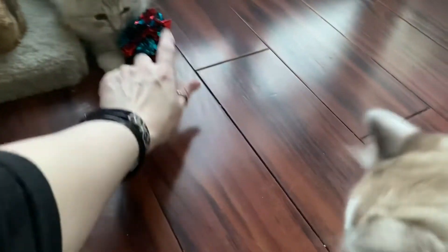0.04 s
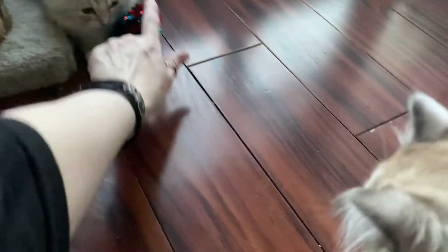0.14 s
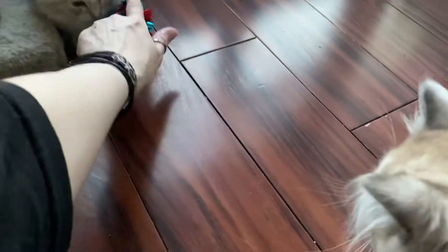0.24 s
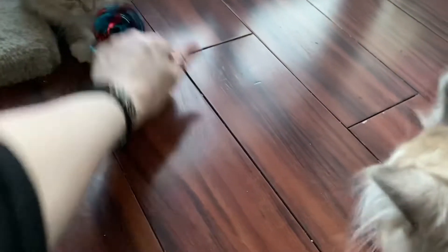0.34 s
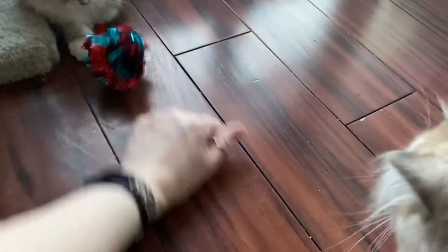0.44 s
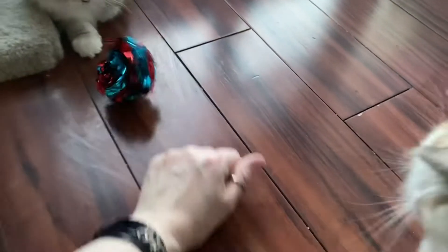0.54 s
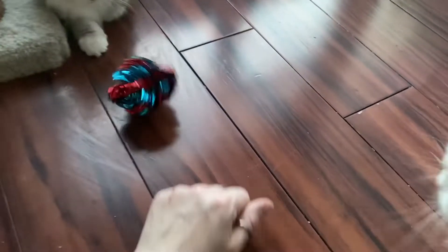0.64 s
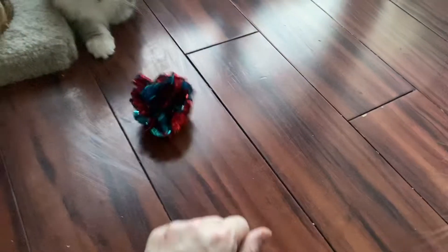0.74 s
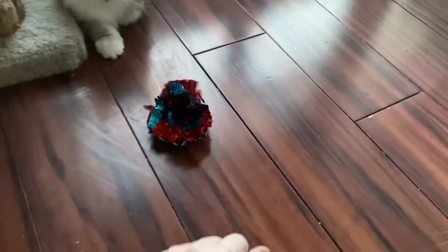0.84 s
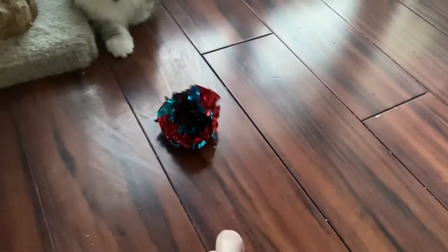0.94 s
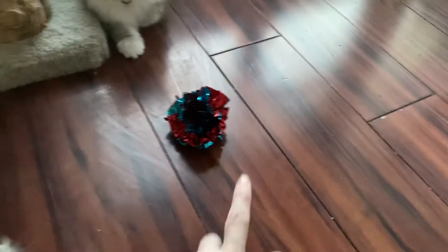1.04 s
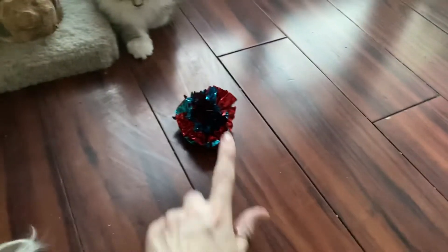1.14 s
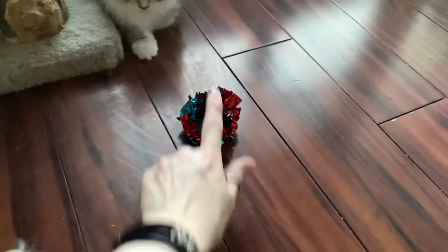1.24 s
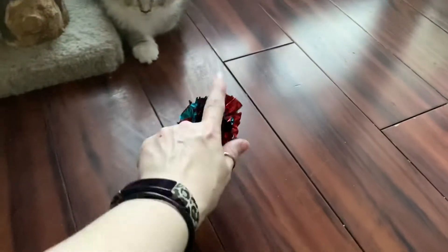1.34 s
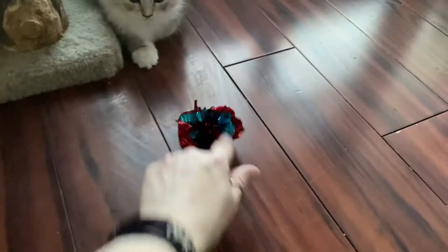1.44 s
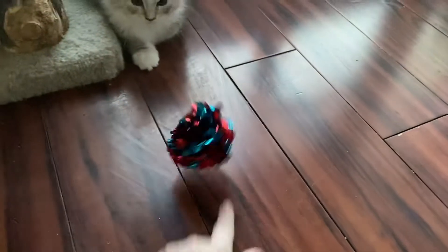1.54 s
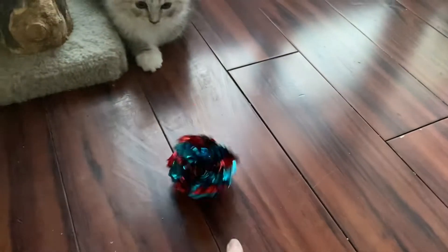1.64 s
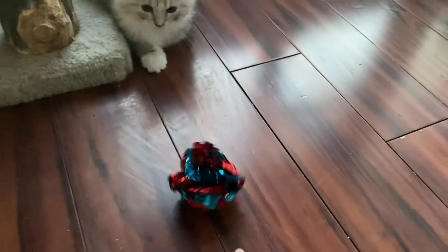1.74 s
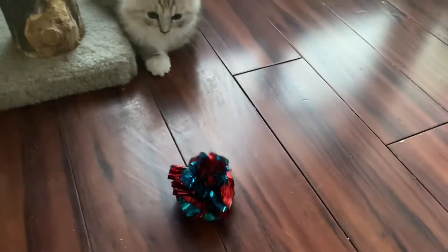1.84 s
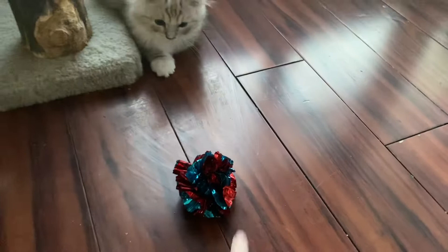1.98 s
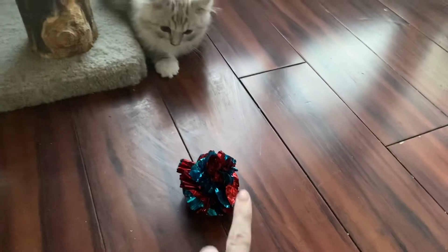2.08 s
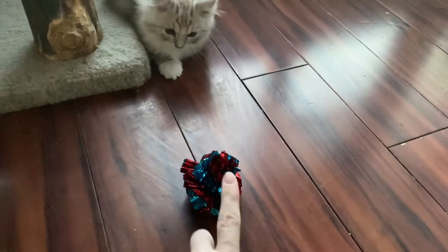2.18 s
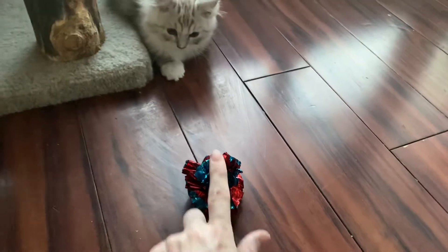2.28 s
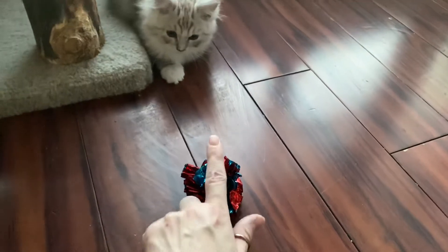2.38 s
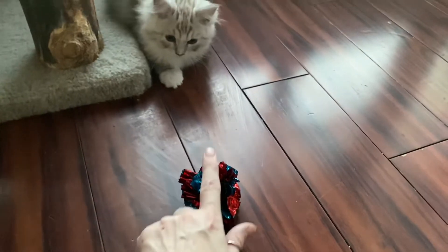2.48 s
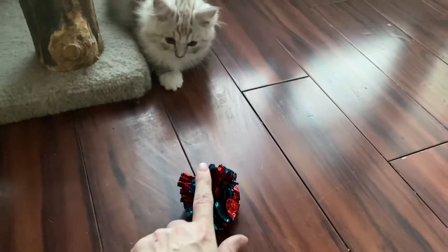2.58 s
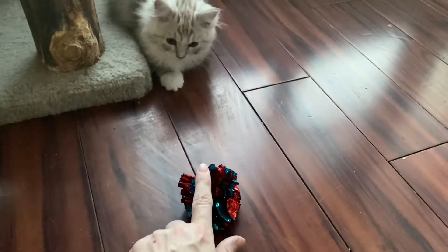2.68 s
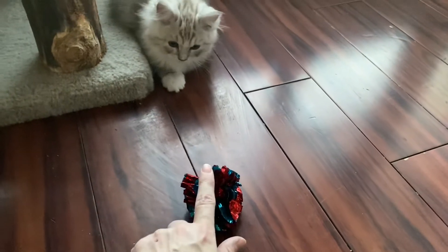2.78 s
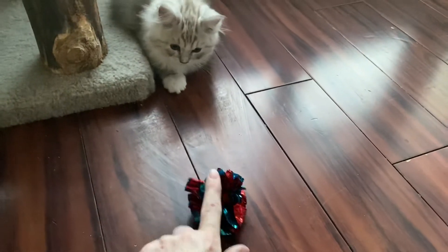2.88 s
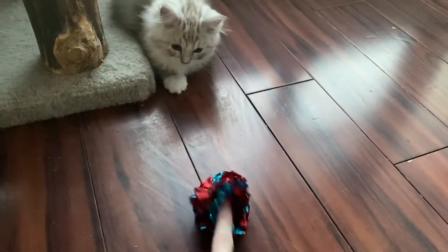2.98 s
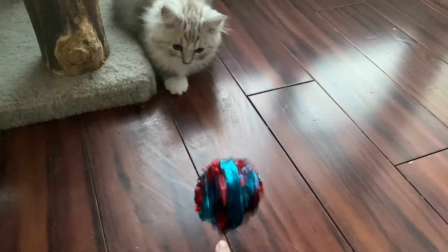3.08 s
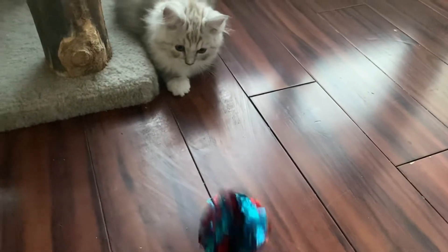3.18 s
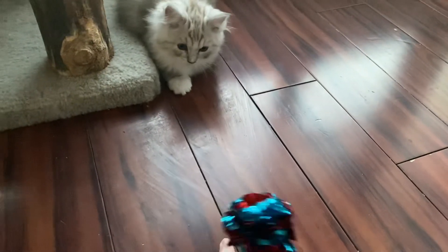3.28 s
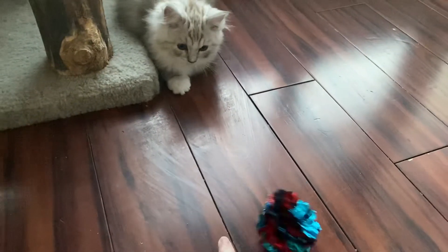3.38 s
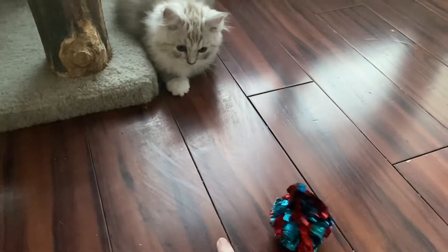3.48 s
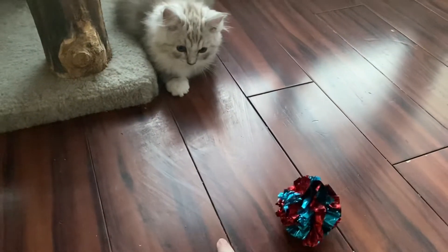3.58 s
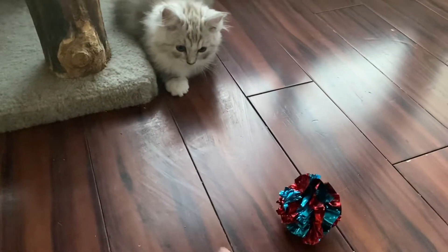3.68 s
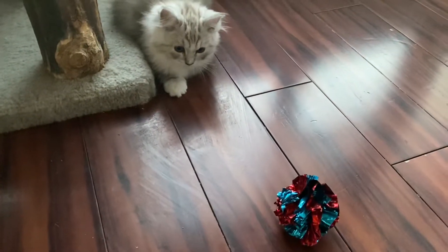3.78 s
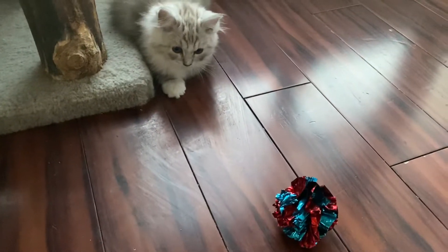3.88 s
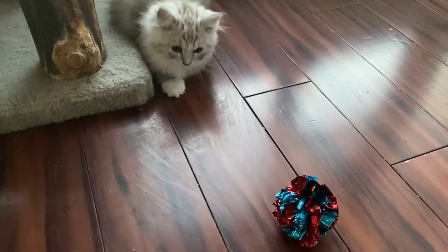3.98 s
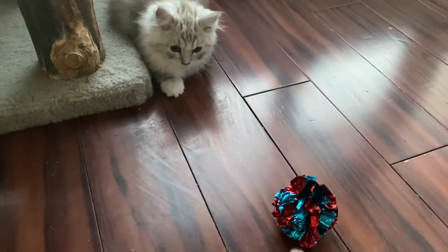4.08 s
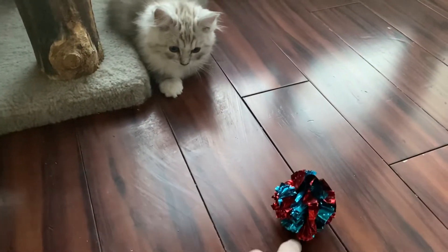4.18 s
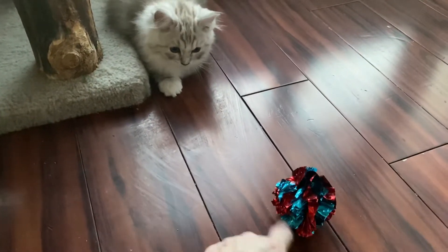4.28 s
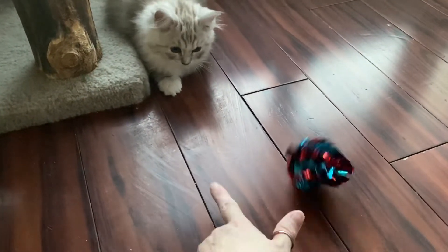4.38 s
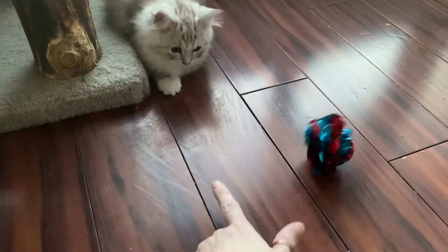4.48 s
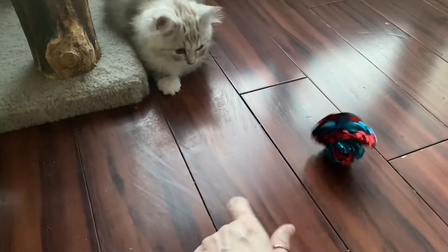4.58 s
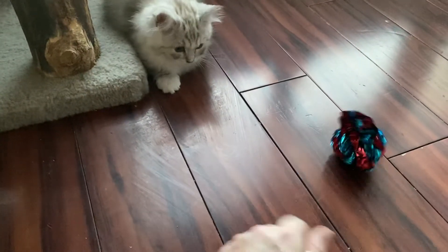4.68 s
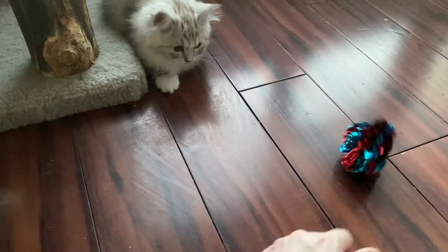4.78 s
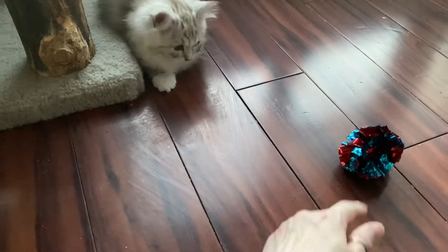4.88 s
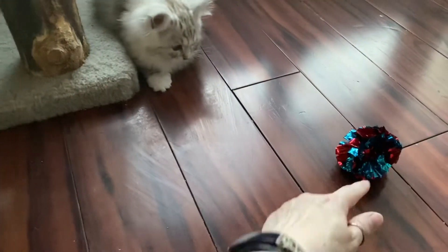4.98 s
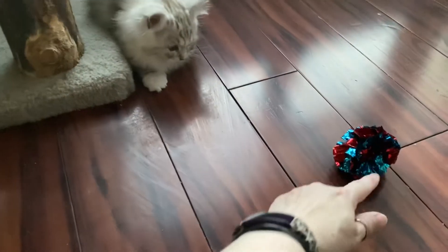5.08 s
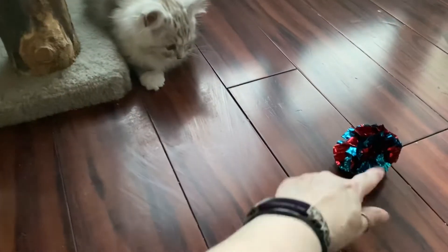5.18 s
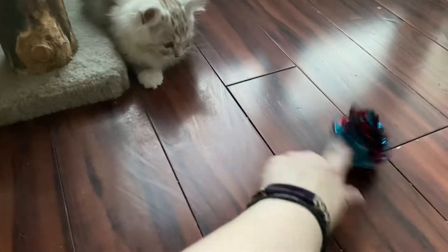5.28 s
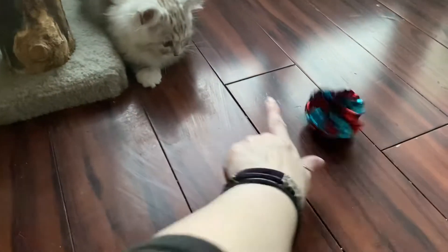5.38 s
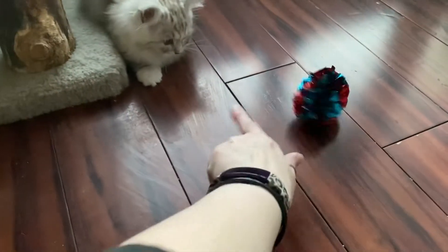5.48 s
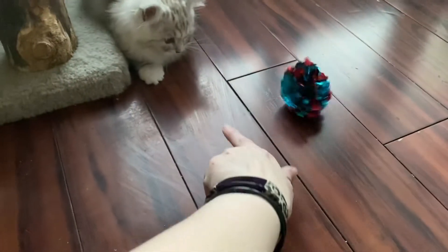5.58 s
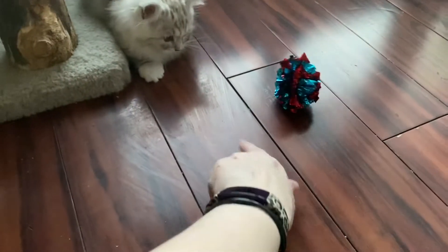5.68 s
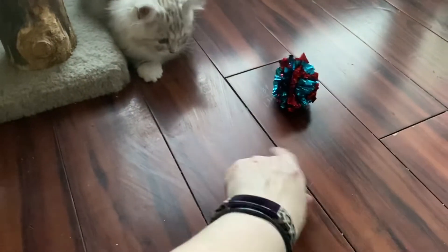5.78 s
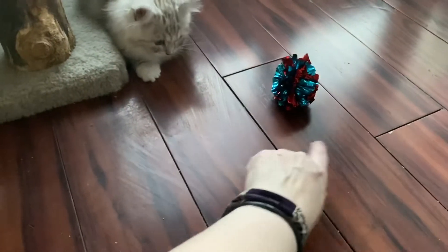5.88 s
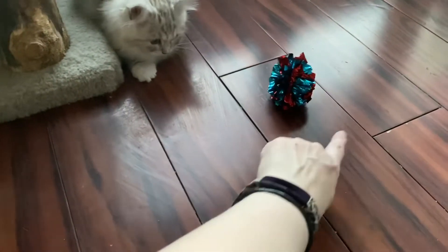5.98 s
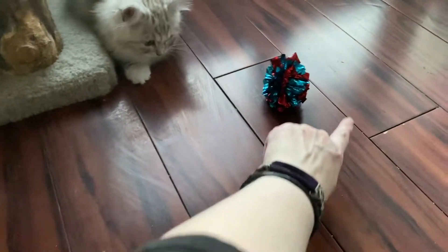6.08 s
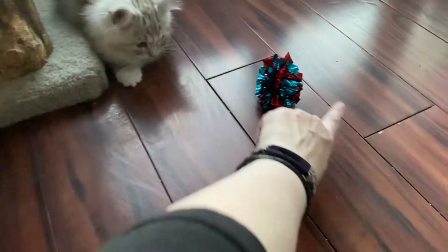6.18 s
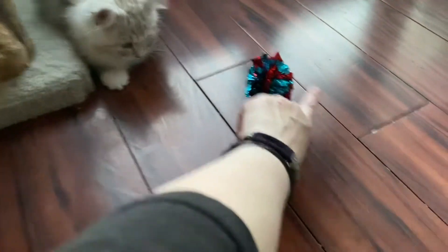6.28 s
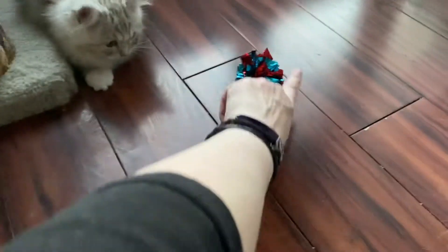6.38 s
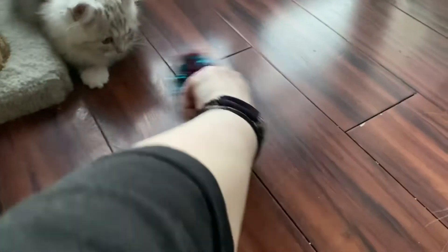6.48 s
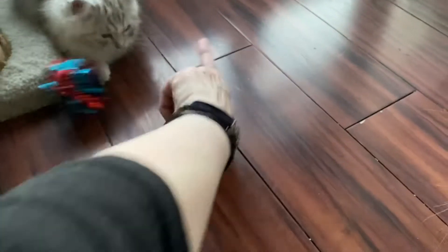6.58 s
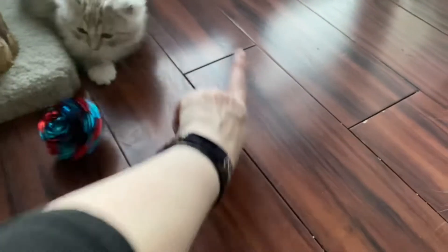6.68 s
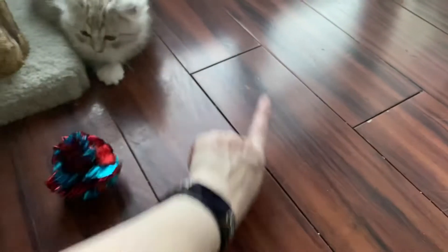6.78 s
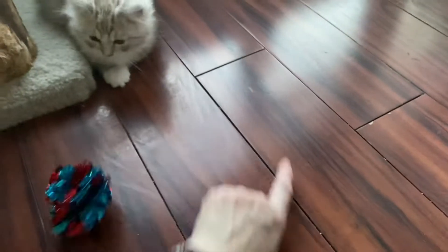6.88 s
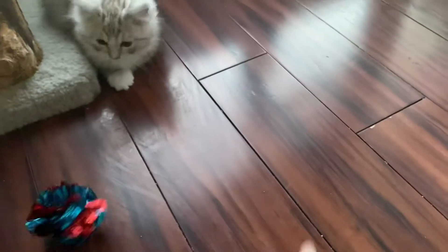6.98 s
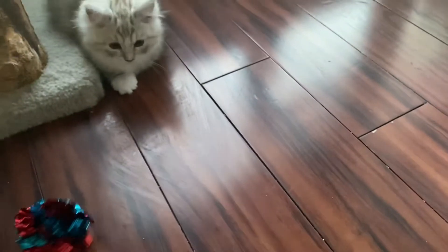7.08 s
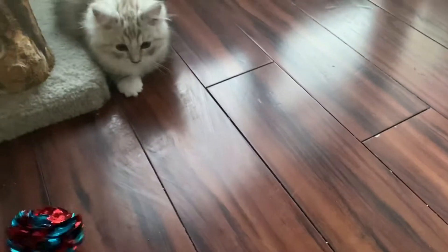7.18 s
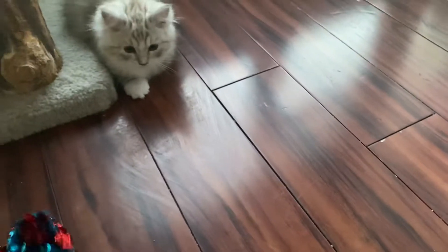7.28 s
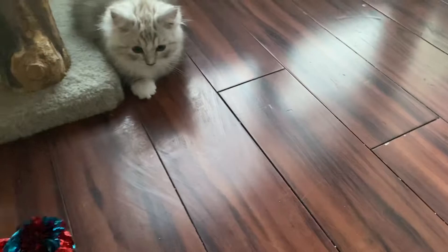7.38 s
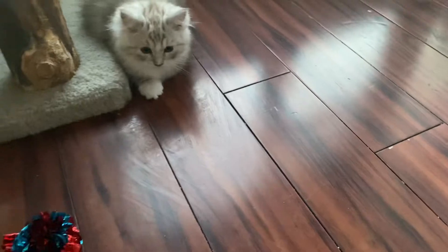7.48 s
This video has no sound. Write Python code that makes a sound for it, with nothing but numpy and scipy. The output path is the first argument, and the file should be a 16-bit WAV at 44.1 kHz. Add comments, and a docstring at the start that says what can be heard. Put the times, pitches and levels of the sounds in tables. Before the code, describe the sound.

In a quiet living room, a crinkled foil ball is poked and batted across a wooden floor. Bright crackling bursts come with each poke, followed by scattered ticks and faint rustling as it rolls. Two sharp knocks of the hand on the boards stand out early, and a short chirping rasp comes near the end. A close phone microphone catches it in stereo over low rumble and soft air noise.

```python
"""In a small living room, a ball of crinkled foil is poked by a finger and tumbles over a wooden floor.
Its leaves crackle densely under each poke, then tick and rustle as it rolls: all built from tiny random bursts.
A hand knocks on the boards (fading tones), cloth whispers (shaped noise), and late on comes one chirping rasp
(wavering tones and noise). A phone picks it all up in stereo over low rumble, soft air noise and a hum."""
import sys
import numpy as np
from scipy import signal
from scipy.fft import rfft, irfft, next_fast_len
from scipy.io import wavfile
from scipy.ndimage import uniform_filter1d, map_coordinates

SR = 44100
rng = np.random.default_rng(int(sys.argv[2]) if len(sys.argv) > 2 else 0)


def output_pcm(signal):
    """Save a mono or channel-first signal as 16-bit PCM at the path in sys.argv[1].

    Samples are clipped to [-1, 1] before scaling.
    """
    pcm = np.clip(np.atleast_2d(signal).T, -1, 1) * 32767
    wavfile.write(sys.argv[1], SR, np.round(pcm).astype(np.int16))


N = 332514  # length of the scene in samples

# Levels in the tables are relative: the functions may add an overall level of their own.
# Arm reaches or draws back with a low rumble: start_s, length_s, level_db
ARM_MOVES = [(0.05, 0.34, -38.5), (0.86, 0.081, -48), (1.66, 0.09, -48), (4.11, 0.12, -42),
             (5.39, 0.41, -50.5)]
# Tone colour of the low rumble: pitch_hz, level_db
RUMBLE_COLOUR = [(12, -30), (20, -23.5), (48, -2), (70, 0.5), (211, -15), (248, -12.5), (280, -29.5),
                 (409, -22), (500, -29), (650, -62), (1100, -120)]
# Tone colour of the still air: pitch_hz, level_db
AIR_COLOUR = [(59, -32), (100, -7), (163, -5.5), (177, -8.5), (249, -8.5), (492, -21), (595, -18.5),
              (1080, -34), (1330, -33.5), (2580, -41.5), (3190, -39.5), (3620, -43), (7610, -53),
              (16000, -58.5)]
# Hum of an appliance: pitch_hz, level_db
APPLIANCE_HUM = [(257, -60)]
# Cloth shifts between pokes: start_s, length_s, level_db
CLOTH_MOVES = [(-0.05, 0.17, -69), (0.96, 0.62, -72.5), (1.84, 0.43, -64), (5.93, 0.089, -76),
               (6.08, 0.14, -68.5)]
# Tone colour of the cloth: pitch_hz, level_db
CLOTH_COLOUR = [(400, 0), (1100, 4), (2300, 4), (3300, -5), (4600, 2.5), (6000, -11), (11000, -10),
                (15000, -17.5)]
# Finger presses the foil until the ball slips away: start_s, length_s, first_level_db, last_level_db
FINGER_POKES = [(0.203, 0.072, -34, -27), (1.34, 0.09, -33, -24), (2.8, 0.18, -57, -19),
                (3.151, 0.036, -28, -34.5), (6.42, 0.081, -36, -37.5)]
# Tone colour of crackling foil: pitch_hz, level_db
FOIL_COLOUR = [(200, -16.5), (600, -4.5), (1200, -0.5), (1800, 2), (2500, 3.5), (4200, 2), (7000, 1),
               (11000, 2), (15300, -2), (16500, -24)]
# Ball lands on a tuft of leaves: time_s, level_db, body_db (lower part of the sound), leaf_pitch_hz
TUFT_LANDINGS = [(0.2147, -30.5, -11, 6000), (0.342, -27.5, -2.5, 1510), (0.382, -30.5, -2.5, 3770),
                 (0.429, -31, -12.5, 3770), (0.489, -27, -7, 4530), (0.66, -37, -7, 2580),
                 (0.739, -34.5, -9, 1890), (0.8, -27.5, -15.5, 2850), (0.876, -35, -0.5, 2460),
                 (1.351, -20.5, -5, 1620), (1.42, -11.5, -12, 2580), (1.5641, -22.5, -6.5, 2410),
                 (1.756, -34, -9, 2170), (2.921, -19, -11, 2700), (2.9658, -8.5, -20, 4300),
                 (3.286, -27, -13, 2660), (3.3641, -30, -8, 2940), (4.098, -42.5, -4.5, 1830),
                 (4.2909, -25, -12.5, 3970), (4.358, -30, -8, 1940), (4.4256, -30.5, 8.5, 3230),
                 (4.5357, -38.5, 3, 3860), (4.6025, -39, -5, 3780), (4.648, -30, -13, 3040),
                 (4.7932, -40, -9, 3150), (4.853, -38, 0.5, 3180), (5.34, -39.5, -7, 3500),
                 (5.4836, -36.5, -8.5, 2340), (5.561, -38.5, -18, 3480), (6.539, -31, -20.5, 4600),
                 (6.672, -28.5, 4, 4270), (6.7457, -29.5, -5, 5500), (6.7691, -37.5, -5, 5490),
                 (7.294, -33.5, -8, 4400)]
# Single creases snap through: time_s, level_db, body_db (lower part of the sound), leaf_pitch_hz
CREASE_SNAPS = [(0.2289, -18, -23, 6060), (0.2734, -25, -15, 3600), (0.5999, -34.5, 4, 2680),
                (0.6388, -35.5, 7, 2870), (0.6905, -33, -3, 4790), (0.8087, -27.5, -6, 1650),
                (0.9212, -38, 8, 2150), (0.9479, -35, -1, 1900), (1.3806, -10.5, -23, 2260),
                (1.4245, -7.5, -11, 2750), (1.6359, -26.5, -5, 4840), (1.6688, -28, -2, 2330),
                (1.8166, -34, -10, 2170), (2.611, -39.5, -7, 2510), (2.7064, -36, -11, 6660),
                (2.8913, -13, -9, 2620), (3.1081, -34, -16, 3140), (3.1754, -22.5, -2, 2500),
                (3.265, -25.5, -41, 5900), (3.2888, -22, -14, 2670), (3.4106, -23, -28, 7230),
                (3.4341, -23, -22, 4300), (3.477, -29, -11, 2920), (3.5402, -34.5, -32, 3630),
                (3.5908, -40, 8, 3100), (3.7207, -34.5, -39, 7850), (3.9875, -41, -38, 3760),
                (4.4307, -29, -1, 3150), (4.4524, -27.5, -11, 3900), (4.8803, -36.5, 13.5, 1540),
                (6.4343, -32, -12, 2450), (6.4455, -17.5, -16, 2960), (6.4705, -20.5, -27, 3030),
                (6.677, -20.5, -11.5, 7040), (7.1161, -42, -7.5, 3740), (7.202, -30, 0, 5500)]
# Ball rolls or is nudged along the boards: start_s, length_s, first_level_db, last_level_db
BALL_ROLLS = [(0.32, 0.56, -60, -66), (1.55, 0.26, -57.5, -69), (2.52, 0.063, -63, -68.5),
              (3.19, 0.38, -64, -60.5), (4.095, 0.74, -61, -67), (5.21, 0.144, -67, -54),
              (5.38, 0.29, -63, -61.5), (6.51, 0.082, -56, -60.5), (6.68, 0.75, -61, -62)]
# Tone colour of foil brushing on wood: pitch_hz, level_db
BRUSH_COLOUR = [(300, -16.5), (900, 0), (1600, 3.5), (2400, 4), (3700, 5.5), (5500, 0), (8000, -6.5),
                (11000, -4), (15300, -11.5), (16500, -28)]
# Blows of a hand on the floor: time_s, peak_level_db, contact_ms
HAND_KNOCKS = [(.514, -33.5, 13), (1.502, -12, 0.58), (2.23, -19.5, 4.63), (2.980, -11.5, 0.61),
               (5.44, -36.5, 6.5), (5.852, -30.5, 11.8), (7.171, -40, 2.9)]
# Tones at which the boards ring: pitch_hz, level_db, t60_s (time to fade by 60 dB)
BOARD_TONES = [(62.7, -3, 0.17), (100, 0, .07), (134.9, -1, 0.066), (200, -0.5, 0.046), (271, 2, 0.03),
               (443, 10.5, 0.028), (780, 14.5, 0.012), (1000, 12.5, 0.014), (1600, 9, 0.011)]
# Path of the chirping rasp: time_s, level_db, resonance_hz, overtone_db
RASP_PATH = [(6.844, -36, 2080, -53), (6.852, -39, 2120, -51), (6.876, -31.5, 2110, -61),
             (6.904, -34.5, 1792, -42.5), (6.978, -35.5, 1711, -39), (7.02, -50, 1600, -56)]
# Tone colour of the rasp's main part: pitch_hz, level_db
RASP_TONE_COLOUR = [(500, -17), (850, -13), (1080, 2), (1400, -6), (2100, -4), (2700, -4.5), (3500, -13.5),
                    (4100, -16), (7000, -27)]
# How long the room rings: pitch_hz, t60_s (time to fade by 60 dB)
ROOM_FADE = [(100, 0.44), (600, .33), (2500, 0.3), (7000, 0.21), (15000, 0.12)]
# Where the ball is: time_s, lead_ms (how much sooner it reaches the left port)
LEFT_LEAD = [(0.3, 0.01), (1.4, 0.049), (3.0, 0.057), (3.8, 0.005), (7.5, 0.005)]

RUMBLE_DB, RUMBLE_WAVER_DB = -52, 2  # the room's own rumble, and about how far it wanders
ARM_ATTACK_S, ARM_RELEASE_S = 0.079, 0.16
PRESS_POWER = 2.29  # the pressure changes with this power of the time pressed
POKE_ATTACK_S, POKE_RELEASE_S = 0.019, 0.038
FLURRY_S = 0.014  # how long a tuft takes to give way
SLOWING_POWER = 0.97  # the brushing changes with this power of the time rolled
ROLL_ATTACK_S, ROLL_RELEASE_S = 0.023, 0.35
TUFTS_PER_S, TUFT_DB = 60, 3  # pace and depth of the random swelling of the brushing
STRAYS_PER_S, STRAY_DB = 30, -8.5  # stray ticks of a rolling ball, and their level against the brushing
TOP_HZ = 16100  # nothing is heard from this pitch up


def amp(db):
    """Turn decibels into a plain gain."""
    return 10 ** (np.asarray(db) / 20)


def unit(x):
    """Scale a sound to an rms (average strength) of 1."""
    return x / np.sqrt(np.mean(x ** 2, axis=-1, keepdims=True) + 1e-20)


def along(points, hz):
    """Read values between (Hz, value) points, with pitch on a log axis."""
    f, v = np.transpose(points)
    return np.interp(np.log(hz + 1), np.log(f + 1), v)


def level(rows):
    """Gain per sample from (s, dB) rows, practically silent outside them."""
    s, db = np.transpose(rows)[:2]
    curve_db = np.interp(np.arange(N) / SR, s, db, left=-150, right=-150)
    return uniform_filter1d(amp(curve_db), size=128)


def wobble(rate):
    """A smooth random curve through `rate` random points a second."""
    points = rng.standard_normal(int(N * rate / SR) + 4)
    return map_coordinates(points, [np.arange(N) * rate / SR])


def filtered(x, response):
    """Change strength and timing pitch by pitch, by a response that depends on Hz."""
    m = next_fast_len(N + SR // 2)
    return irfft(rfft(x, m) * response(np.fft.rfftfreq(m, 1 / SR)), m)[..., :N]


def coloured(x, spectrum, size=2048):
    """Give x a (Hz, dB) tone colour with a filter of unit energy that never sounds ahead of its input."""
    cepstrum = irfft(np.log(amp(along(spectrum, np.fft.rfftfreq(size, 1 / SR)))))
    # fold the second half onto the first, so that the filter responds at once
    cepstrum[1:size // 2] *= 2
    cepstrum[size // 2 + 1:] = 0
    kernel = irfft(np.exp(rfft(cepstrum)))
    return signal.fftconvolve(x, kernel / np.linalg.norm(kernel))[:N]


def noise(spectrum, side_db):
    """Stereo noise of rms 1; side_db sets how much the two channels differ."""
    mid, side = filtered(rng.standard_normal((2, N)), lambda hz: amp(along(spectrum, hz)))
    side = amp(side_db) * side
    return unit(np.array([mid + side, mid - side]))


def add(track, s, sound):
    """Lay a sound into a track at s seconds."""
    start = max(round(s * SR), 0)
    track[start:start + len(sound)] += sound[:N - start]


def gate(start, length, attack_s, release_s):
    """Gain per sample: a smooth attack, a hold and a release that falls 60 dB in release_s."""
    t = np.arange(N) / SR - start
    attack = np.sin(np.pi / 2 * np.clip(t / attack_s, 0, 1))
    return attack * amp(-60 * np.maximum(t - length, 0) / release_s)


def gestures(rows):
    """Gain per sample of arm movements, which all start and stop alike."""
    return sum(amp(db) * gate(start, length, ARM_ATTACK_S, ARM_RELEASE_S) for start, length, db in rows)


def strokes(rows, power, attack_s, release_s):
    """Gain per sample of strokes that each pass from their first level to their last."""
    gain = np.zeros(N)
    for start, length, first_db, last_db in rows:
        progress = np.clip((np.arange(N) / SR - start) / length, 0, 1) ** power
        strength = amp(first_db) + (amp(last_db) - amp(first_db)) * progress
        gain += strength * gate(start, length, attack_s, release_s)
    return gain


def crackles(count, tick_t60=0.0015, ring_t60=0.009, ring_db=-14, size=400, order=3):
    """One row of unit energy per buckling crease: a sharp tick and a few brief tones of its leaf."""
    t = np.arange(size) / SR
    waves = rng.standard_normal((count, size)) * amp(-60 * t / tick_t60)
    fade = amp(-60 * t / ring_t60)
    for hz in rng.uniform(1200, 15000, (order, count, 1)):
        waves += amp(ring_db) * fade * np.sin(2 * np.pi * hz * t)
    return waves / np.linalg.norm(waves, axis=1, keepdims=True)


def scatter(starts, gains, size):
    """Sum of crackles that begin at the given samples."""
    waves = crackles(len(starts)) * gains[:, None]
    places = starts[:, None] + np.arange(waves.shape[1])
    return np.bincount(places.ravel(), waves.ravel(), size)[:size]


def crinkle(rate, spread_db):
    """A stream of `rate` crackles a second, many small and a few large, of rms 1."""
    count = int(rate * N / SR)
    gains = amp(spread_db * np.minimum(rng.exponential(size=count), 3.5))
    return unit(scatter(rng.integers(0, N, count), gains, N))


def patchy(x, depth_db, count=9):
    """Ever-changing leaves favour now some pitches, now others."""
    z = signal.stft(x, nperseg=512)[2]
    field = uniform_filter1d(rng.standard_normal(z.shape), size=6, axis=0)  # smooth over pitch
    field = uniform_filter1d(field, size=count, axis=1)  # smooth over time
    return unit(signal.istft(z * amp(depth_db * unit(field)), nperseg=512)[1][:N])


def leaf(wave, body_db, leaf_hz, corner_hz=3200):
    """The leaf rings broadly at its own pitch; larger leaves give more low treble. Unit energy."""
    low = signal.lfilter(*signal.butter(1, corner_hz, fs=SR), wave)
    shaped = wave + (amp(body_db) - 1) * low
    shaped = shaped + signal.lfilter(*signal.iirpeak(leaf_hz, 4, fs=SR), shaped)
    return shaped / np.linalg.norm(shaped)


def background():
    """Low rumble that swells as the arm moves, still air, and an appliance's wavering hum."""
    resting = amp(RUMBLE_DB + RUMBLE_WAVER_DB * wobble(7.5))
    rumble = np.hypot(resting, amp(0.5) * gestures(ARM_MOVES)) * noise(RUMBLE_COLOUR, side_db=-14)
    air = amp(-53.5) * noise(AIR_COLOUR, side_db=-5.0)
    hum = np.zeros(N)
    for hz, db in APPLIANCE_HUM:
        strength = amp(db + 2.3 * wobble(7.5)) * np.sqrt(2)
        hum += strength * np.sin(2 * np.pi * hz * np.arange(N) / SR + 0.81 * wobble(16))
    return rumble + air + hum


def sleeve():
    """Cloth whispers, as unsteady noise, as the arm draws back and reaches out."""
    return amp(2.0) * gestures(CLOTH_MOVES) * amp(1.5 * wobble(20)) * noise(CLOTH_COLOUR, side_db=-1.5)


def pokes():
    """Under the finger many creases give way, in little avalanches."""
    crush = patchy(crinkle(rate=1800, spread_db=0.5), depth_db=3.0)
    clumps = amp(1.6 * wobble(170))
    pressure = strokes(FINGER_POKES, PRESS_POWER, POKE_ATTACK_S, POKE_RELEASE_S)
    return amp(-2.5) * pressure * unit(clumps * crush)


def landings(count=18, size=4096):
    """Each landing sets off a flurry of crackles that tend to weaken."""
    track = np.zeros(N)
    for s, db, body_db, leaf_hz in TUFT_LANDINGS:
        progress = (np.arange(count) + rng.random(count)) / count
        gains = amp(rng.normal(0, 4.5, count) - 7 * progress)
        flurry = scatter((progress * FLURRY_S * SR).astype(int), gains, size)
        add(track, s, amp(db + 14.5) * leaf(flurry, body_db + 10.5, leaf_hz))
    return track


def snaps(count=5, follow_s=0.003, follow_db=-7):
    """A crease flips, and its neighbours follow, mostly fainter."""
    track = np.zeros(N)
    for s, db, body_db, leaf_hz in CREASE_SNAPS:
        starts = np.append(0, rng.random(count) * follow_s * SR).astype(int)
        gains = amp(np.append(0, rng.normal(follow_db, 1.8, count)))
        snap = scatter(starts, gains, size=1024)
        add(track, s, amp(db + 10.5) * leaf(snap, body_db + 9.5, leaf_hz))
    return track


def rolls():
    """Rolling bends leaves lightly: a fine crackle that swells as tufts meet the boards, with stray ticks."""
    tufts = unit(amp(TUFT_DB * wobble(TUFTS_PER_S)))
    grains = patchy(crinkle(rate=1500, spread_db=1.5) * tufts, depth_db=4.0)
    strays = amp(STRAY_DB) * patchy(crinkle(rate=STRAYS_PER_S, spread_db=5.0), depth_db=4.5)
    rolling = strokes(BALL_ROLLS, SLOWING_POWER, ROLL_ATTACK_S, ROLL_RELEASE_S)
    return amp(2.5) * rolling * (coloured(grains, BRUSH_COLOUR) + coloured(strays, FOIL_COLOUR))


def knocks():
    """The boards ring under a hand; the longer the contact, the duller the thud."""
    track, t = np.zeros(N), np.arange(SR // 3) / SR
    for s, peak_db, contact_ms in HAND_KNOCKS:
        ring = np.zeros(len(t))
        for k, (hz, mode_db, t60) in enumerate(BOARD_TONES):
            fade = amp(mode_db + rng.normal(0, 1) - 60 * t / t60)
            ring += (-1) ** k * fade * np.sin(2 * np.pi * hz * t)
        push = np.sin(np.pi * np.minimum(t * 1e3 / contact_ms, 1)) ** 2
        blow = signal.fftconvolve(ring, push)[:len(t)]
        blow = signal.lfilter(*signal.butter(2, 45, "high", fs=SR), blow)
        add(track, s, amp(peak_db) * blow / np.abs(blow).max())
    return track


def rough(turn, width_hz):
    """A tone blurred by random wobbling, so that it covers a band of pitches; rms 1."""
    return unit(wobble(2 * width_hz) * np.sin(turn) + wobble(2 * width_hz) * np.cos(turn))


def rasp(width_hz=520, overtone_hz=3250, overtone_width_hz=430):
    """A chirping rasp: a rough resonance that sinks, and a thinner one that swells above it."""
    t = np.arange(N) / SR
    s, db, centre_hz, overtone_db = np.transpose(RASP_PATH)
    phase = 2 * np.pi * np.cumsum(np.interp(t, s, centre_hz)) / SR
    grit = amp(2.5) * rng.standard_normal(N)
    main = unit(coloured(rough(phase, width_hz) + grit, RASP_TONE_COLOUR))
    overtone = rough(2 * np.pi * overtone_hz * t, overtone_width_hz)
    flutter = unit(amp(2.2 * wobble(420)))
    main = amp(1.5) * level(np.c_[s, db]) * main
    overtone = amp(-3.0) * level(np.c_[s, overtone_db]) * overtone
    return flutter * (main + overtone)


def room(x, side_db, count=36, wide_hz=350):
    """The room's stereo echoes: fading noise, drawn anew for each slice of time as the source moves."""
    wet = np.zeros((2, N + SR))
    edges = np.linspace(0, N, count + 1).astype(int)
    for a, b in zip(edges, edges[1:]):
        hz, t, z = signal.stft(rng.standard_normal((2, SR // 2)), SR, nperseg=256)
        tail = signal.istft(z * amp(-60 * t / along(ROOM_FADE, hz)[:, None]), SR, nperseg=256)[1]
        # the first echoes take a moment to arrive
        tail *= 1 - np.exp(-(np.arange(tail.shape[1]) / SR / 0.0015) ** 2)
        answer = signal.fftconvolve(x[None, a:b], tail / np.linalg.norm(tail[0]), axes=1)
        wet[:, a:a + answer.shape[1]] += answer
    mid = wet[0, :N]
    # long waves reach both ports alike
    side = amp(side_db) * signal.lfilter(*signal.butter(1, wide_hz, "high", fs=SR), wet[1, :N])
    return np.array([mid + side, mid - side]) / np.sqrt(1 + amp(side_db) ** 2)


def ports(x):
    """Direct sound reaches the left port a little sooner, depending on where the ball is."""
    n = np.arange(N)
    lead = np.interp(n / SR, *np.transpose(LEFT_LEAD)) * SR / 1000  # in samples
    return np.array([map_coordinates(x, [n + lead], order=5), x])


def scene():
    """The ball, the boards and the rasp sound in the room, over cloth and the quiet background."""
    crush = coloured(pokes(), FOIL_COLOUR) + rolls()
    ticks = coloured(landings() + snaps(), FOIL_COLOUR)
    ball = ports(crush + ticks) + room(amp(-4.0) * crush + amp(-4.5) * ticks, side_db=1.5)
    thuds, chirp = knocks(), rasp()
    # the direct thuds are 1 dB up on the left and 1 dB down on the right
    floor = thuds * amp(np.array([[1.0], [-1.0]])) + amp(-10) * room(thuds, side_db=-0.5)
    chirp_in_room = chirp + amp(-6.5) * room(chirp, side_db=2.5)
    return ball + floor + chirp_in_room + sleeve() + background()


def record(dry, split_hz=6500, comb_hz=4200, align_hz=6900):
    """The phone takes its top treble from the right port and widens it with a short delay on the left."""
    def low(hz):
        return 1 / np.sqrt(1 + (hz / split_hz) ** 20)

    def delayed_high(hz):
        # a delay of 1 / comb_hz seconds, turned so that both sides agree at align_hz
        delay = np.exp(-2j * np.pi * (hz - align_hz) / comb_hz)
        return np.sqrt(1 - low(hz) ** 2) * delay

    left = filtered(dry[0], low) + filtered(dry[1], delayed_high)
    return filtered(np.array([left, dry[1]]), lambda hz: hz < TOP_HZ)


dry = scene()
out = record(dry)
output_pcm(out)
```